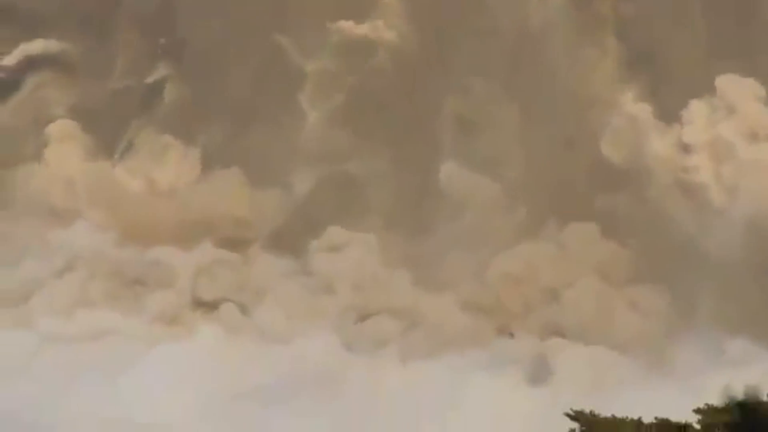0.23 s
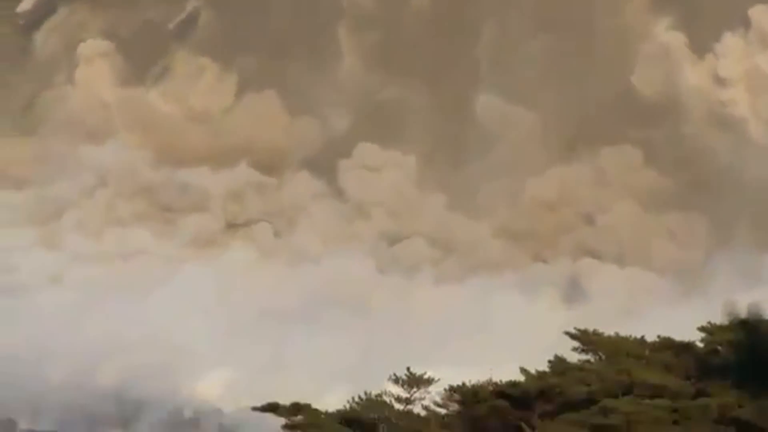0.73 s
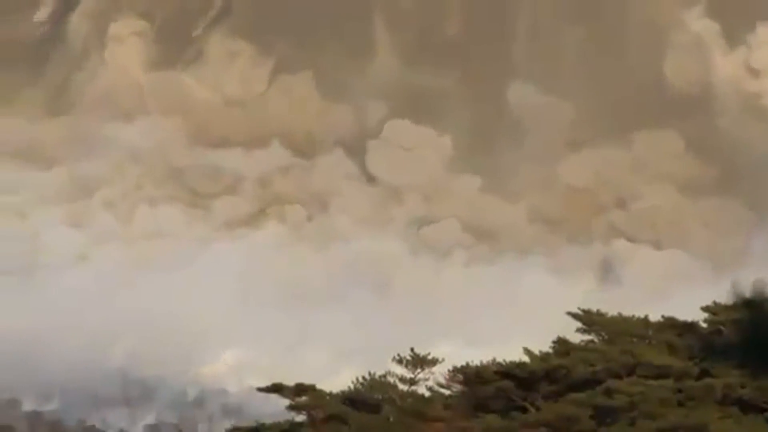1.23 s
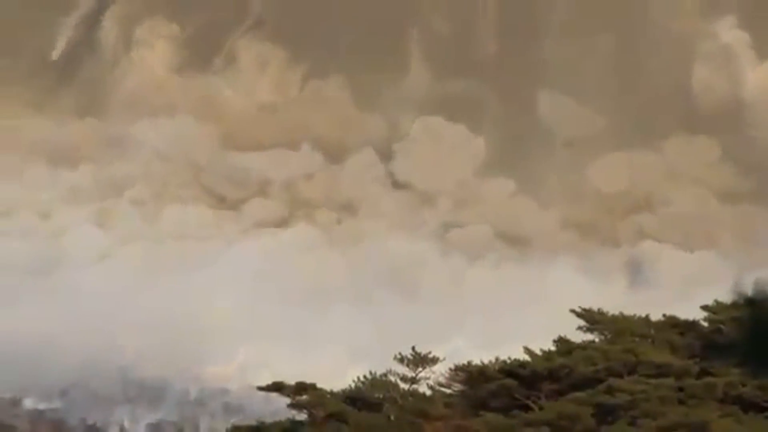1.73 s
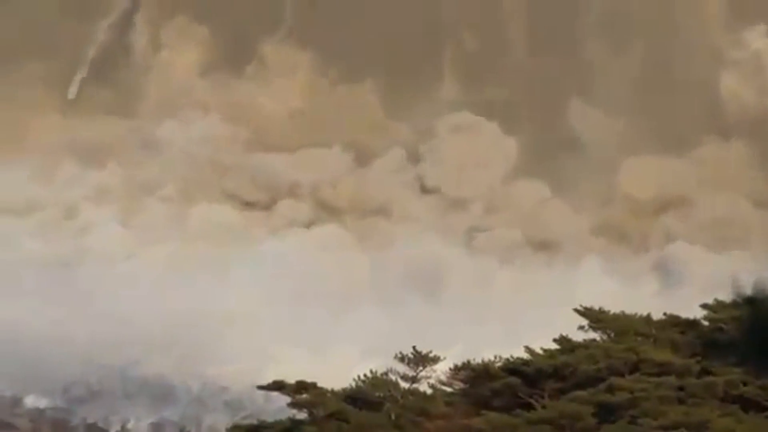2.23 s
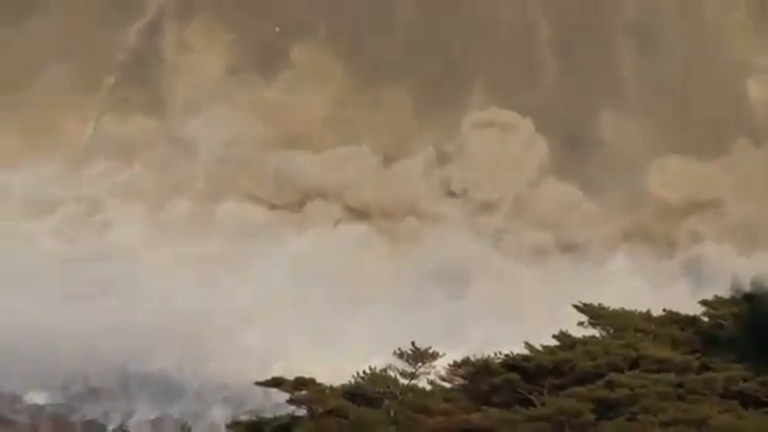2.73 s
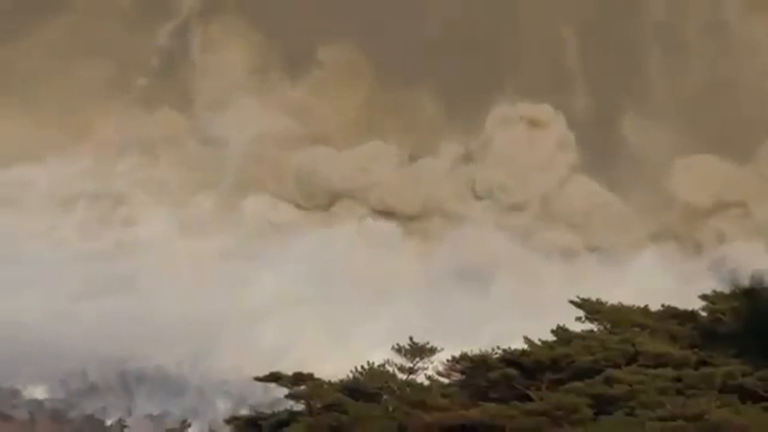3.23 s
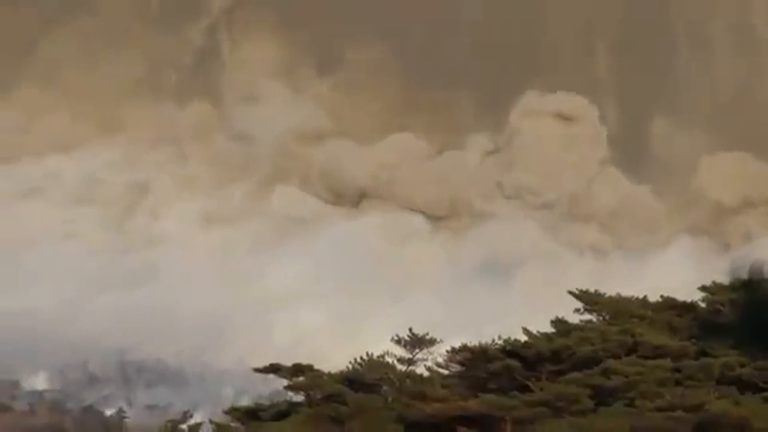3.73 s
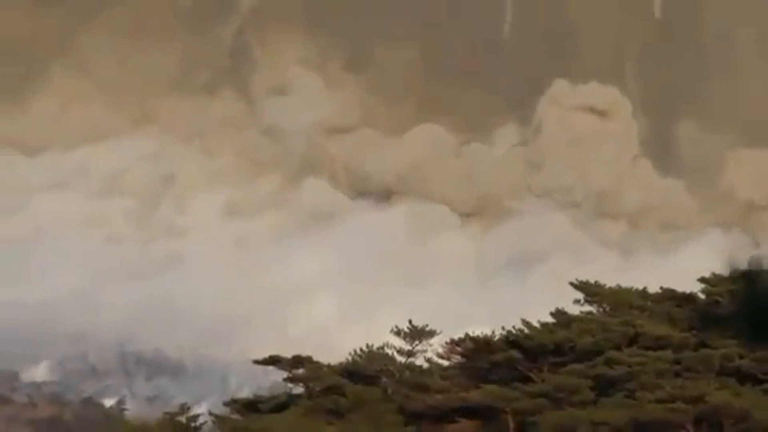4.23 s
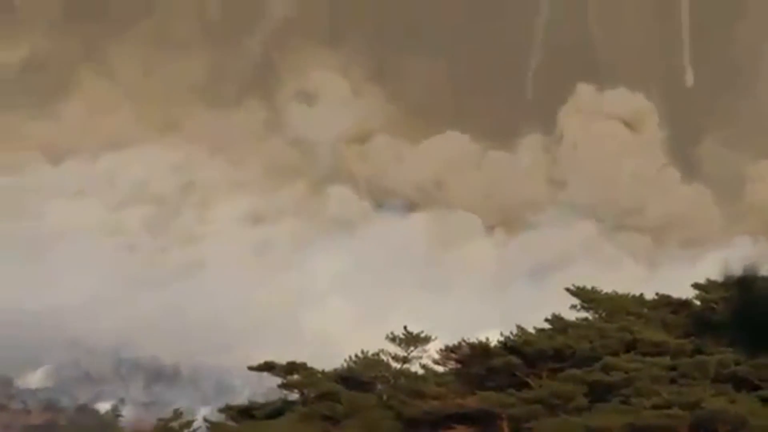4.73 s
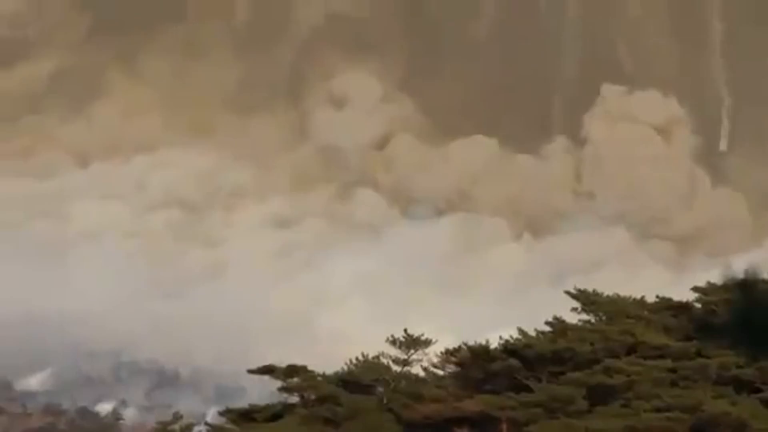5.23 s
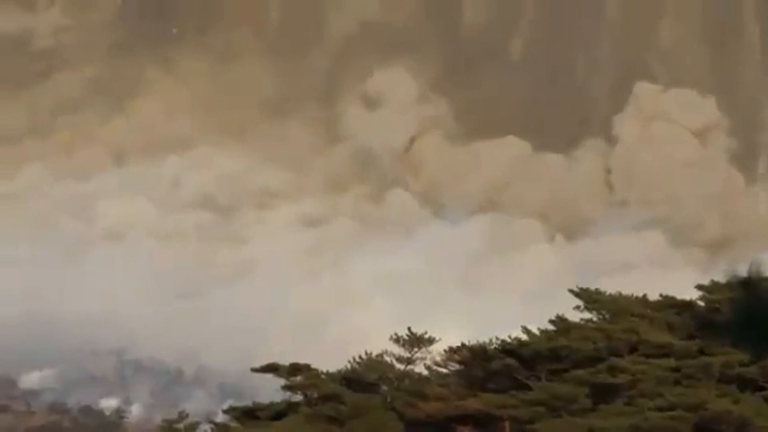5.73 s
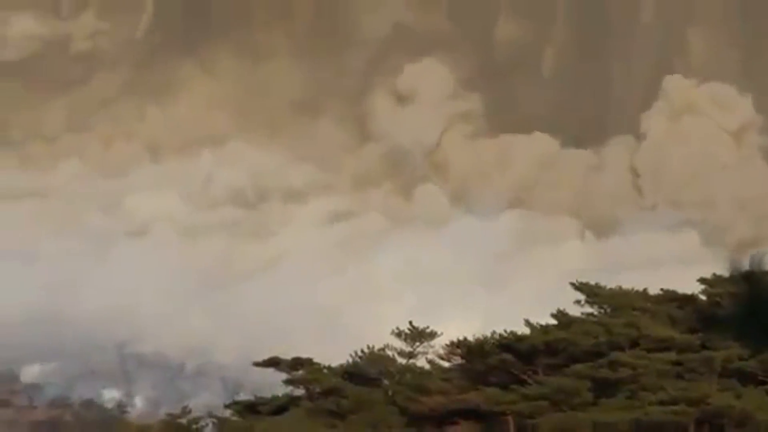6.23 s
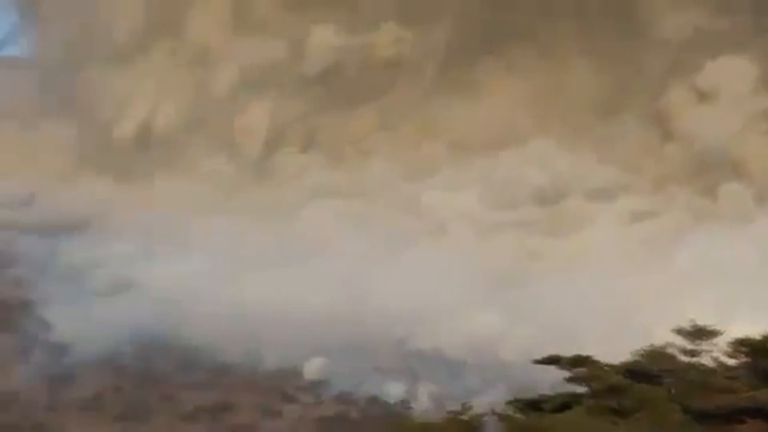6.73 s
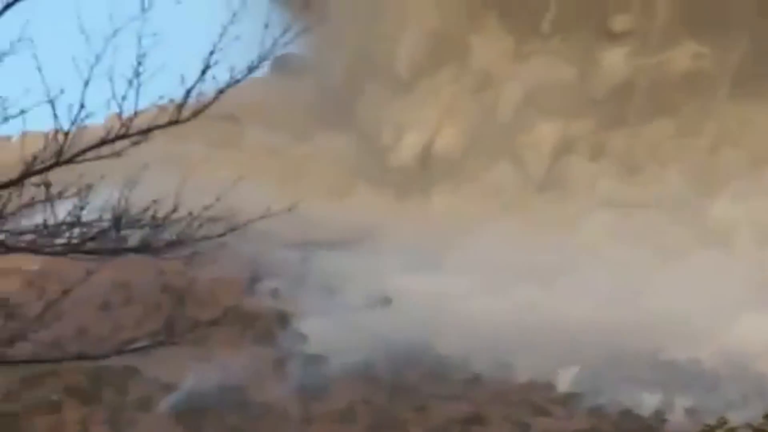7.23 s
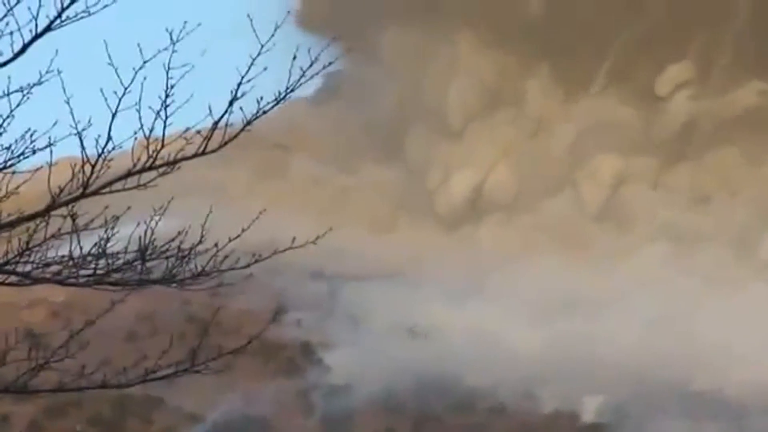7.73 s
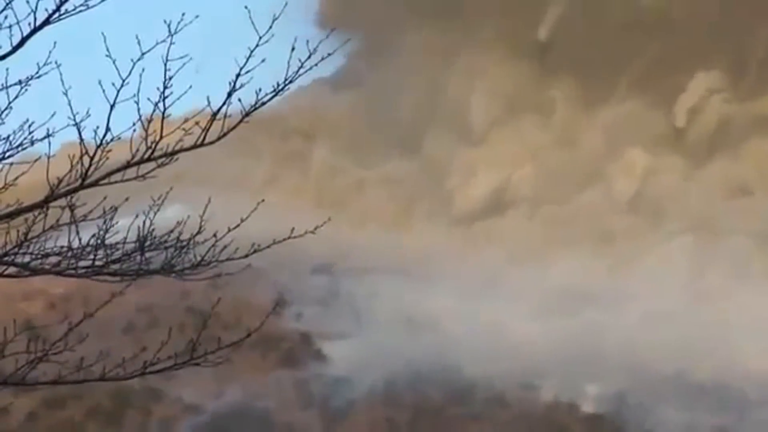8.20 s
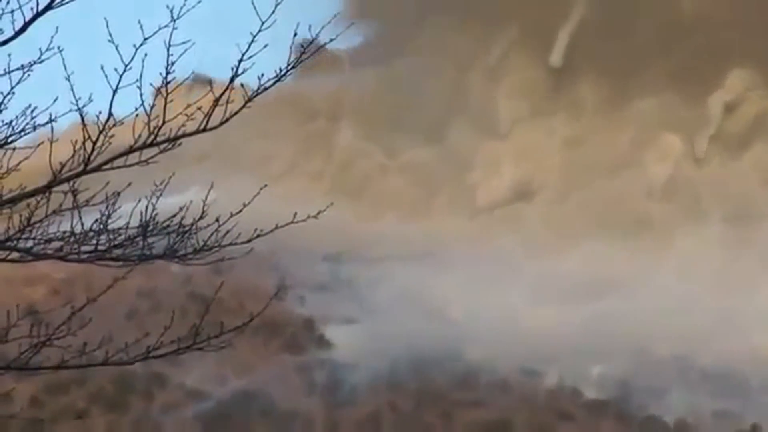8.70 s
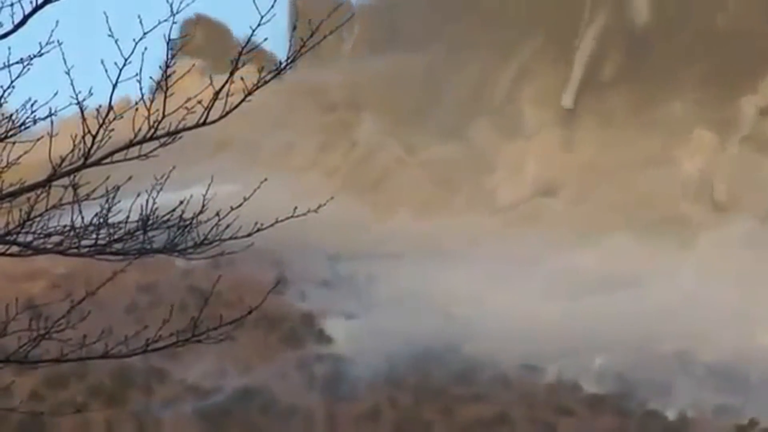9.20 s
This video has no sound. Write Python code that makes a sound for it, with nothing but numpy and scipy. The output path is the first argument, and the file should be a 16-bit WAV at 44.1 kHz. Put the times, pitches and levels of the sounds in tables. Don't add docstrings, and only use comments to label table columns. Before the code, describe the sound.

Wind buffets dominate, low fluttering thuds that overload a small handheld stereo microphone and briefly push down the steady rushing roar of a far-off ash eruption. Beneath it lies lumpy bass rumble with irregular booms. Small clicks come early and around the two-thirds mark. Near the end, metallic starter gears engage close by, leaning left, chug five times, whirr freely and release.

```python
import sys
import numpy as np
from scipy import signal
from scipy.fft import rfft, irfft
from scipy.io import wavfile
from scipy.ndimage import uniform_filter1d

SR = 44100
rng = np.random.default_rng(int(sys.argv[2]) if len(sys.argv) > 2 else 0)


def dump_mix(stems):
    frames = np.atleast_2d(stems).T
    limited = np.clip(frames, -1, 1)
    pcm = np.round(limited * 32767).astype(np.int16)
    wavfile.write(sys.argv[1], SR, pcm)


def level_to_linear(level):
    exponent = np.asarray(level, float) / 20
    return 10 ** exponent


N = 417186
HZ = np.fft.rfftfreq(N, 1 / SR)
TIME = np.arange(N) / SR

# start_s, deep_db, growl_over_deep_db
VENT = [(0.0, -17.5, -9), (0.26, -30, 1), (0.53, -25, -6), (0.61, -16.5, -14), (0.66, -22, -3.5),
        (1.18, -29, 1), (1.74, -25, -6), (2.08, -27, 1), (2.16, -26, -3), (4.4, -29, -4),
        (4.58, -20.5, -11), (4.77, -29.5, -4.5), (5.45, -23.5, -9), (6.24, -31.5, -1.5), (7.77, -30.5, -3),
        (8.25, -28.5, -3.5), (8.38, -33.5, -1), (9.46, -32, -3)]
# freq_hz, density_db
DEEP = [(35, -22.5), (46, 1.5), (70, 5), (105, -2), (135, -37)]
GROWL = [(85, -26), (112, 1.5), (160, 1), (230, -7), (340, -11), (450, -22.5)]
# start_s, peak_db, pitch_hz, length_cycles
BOOMS = [(0.612, -30, 61.9, 2.5), (0.796, -10.5, 145.5, 4.5), (0.917, -9.5, 114, 2.1), (1.24, -20, 130, 6),
         (1.509, -29, 82, 7.5), (1.909, -28, 60.4, 2.5), (2.289, -15, 62.4, 2.8), (3.028, -10, 144, 2.7),
         (3.812, -5, 96.9, 0.79), (4.574, -21, 61.3, 4.7), (5.373, -12, 61, 2.3), (7.353, -25, 87.5, 2.5),
         (9.043, -10, 63, 1), (2.27, -18.5, 140, 5), (5.05, -25, 290, 16.5), (8.17, -18.5, 167, 5.4),
         (9.07, -15, 107, 5.3), (1.78, -20.5, 213.5, 6), (1.38, -23, 315, 8), (3.02, -19.5, 272, 7.5)]
LUMPS_DB, LUMP_S = 1.5, 0.07
RUMBLE_DIPS = 0.69

# freq_hz, density_db
ROAR_COLOUR = [(150, -20.5), (260, -4), (445, -3), (535, -6.5), (1050, -7), (1850, -12.5), (2230, -12.5),
               (2640, -11), (2890, -13), (4180, -20), (5510, -18.5), (6220, -22), (7370, -23.5),
               (10200, -28.5), (13200, -48), (22000, -120)]
# freq_hz, width_hz, lift_db
HOLLOWS = [(2100, 39, 8), (2300, 56, 7.5), (2580, 39, 8), (2840, 50, 2), (3530, 6, 9.5), (5410, 54, 7),
           (5630, 50, 7), (5890, 45, 8)]
ROAR_DB = -29

# start_s, whirr_db, shaft_speed (0-1)
STARTER = [
    (8.362, -41.5, 0.13),
    (8.38, -21, 0.2),
    (8.53, -24.5, 0),
    (8.55, -36.5, 0.61),
    (8.98, -41, 0.53),
    (9.06, -25, 0.75),
    (9.3, -23.5, 0.94),
    (9.375, -17.5, 0.67),
    (9.46, -30.5, 0.07),
]
# start_s, rise_s, peak_db
STROKES = [
    (8.548, 0.067, -20),
    (8.691, 0.033, -19),
    (8.798, 0.026, -19),
    (8.895, 0.019, -18),
    (8.992, .027, -20),
]
CATCH_DB, FALL_DB_PER_S = -8, 235
# start_s, level_db, rattle_s, treble_tilt_db
CLUNKS = [
    (8.366, -35.5, 0.025, -3),
    (8.378, -20, 0.015, 7),
    (8.392, -12, 0.012, 0.5),
    (8.691, -23.5, 0.0077, 1.5),
    (8.799, -22, 0.014, 1),
    (8.99, -18.5, 0.013, -1.5),
    (9.368, -18.5, .016, -0.5),
]
# freq_hz, width_hz, level_db
CASING = [(380, 69, -15.5), (620, 73, -7.5), (766, 15, -1), (840, 81, 0), (930, 35, -9.5), (990, 24, -1.5),
          (1205, 60, -5), (1250, 96, -16)]
HOUSING = [(1440, 120, -3.5), (1607, 40, 3.5), (1730, 38, 3.5), (1845, 40, 4.5), (1930, 66, -32),
           (2030, 200, -20)]
GEARS = [(2110, 190, -9.5), (2600, 120, -11.5), (2686, 28, -18), (2950, 69, -12.5), (3750, 50, -10),
         (3900, 130, -12), (4140, 120, -10), (4860, 480, -18), (6280, 280, -18.5), (6740, 200, -21.5)]
BRUSHES = [(7360, 1200, -26), (8550, 100, -24), (8800, 60, -31), (8800, 5900, -27.5)]
# slow_db, full_speed_db
LIFTS = [
    (6.5, -2),
    (-4.5, -1),
    (-2, 10.5),
    (-13.5, 8.5),
]
# freq_hz, level_db
CLATTER = [(300, -41), (600, -8), (2300, -4.5), (3400, -15.5), (6600, -20), (7200, -42), (10300, -47.5)]
# middle_s, length_s, from_hz, to_hz, peak_db
MOANS = [(8.403, 0.036, 730, 710, -30), (8.398, 0.018, 1730, 1660, -18.5), (8.412, 0.076, 370, 380, -26.5),
         (8.445, .09, 783, 840, -26), (8.593, .055, 1642, 1545, -18), (8.618, .05, 926, 940, -19.5),
         (8.62, 0.04, 2100, 1540, -20), (8.72, 0.042, 1816, 1746, -18), (8.73, .03, 2266, 2130, -23),
         (8.826, .04, 1890, 1697, -21), (8.387, 0.0358, 2330, 2490, -21), (8.931, .035, 1910, 1585, -17.5),
         (9.01, 0.018, 794, 745, -30), (9.023, 0.049, 1850, 1790, -15.5), (9.028, .03, 2260, 2250, -23),
         (9.27, 0.14, 1845, 1800, -27), (9.29, .05, 825, 823, -23), (9.34, .05, 780, 790, -21),
         (9.341, 0.074, 1563, 1560, -26), (9.375, .045, 2550, 2480, -17.5), (9.2, 0.39, 2580, 2570, -32),
         (9.25, 0.28, 3880, 3840, -29), (9.4, 0.045, 620, 612, -24), (9.411, 0.078, 342, 337, -28)]
WAVER = 0.014
# freq_hz, left_minus_right_db
SHADOW = [(300, 0), (600, 2.5), (4700, 2.5), (6800, 4.5), (8000, 14.5), (10300, 19)]
# freq_hz, likeness (0-1)
DIRECT = [(300, 1), (1100, 0.96), (2300, 1), (4700, 0.67), (7000, 0.18), (9700, 0.38)]
LAST, ROOMY = 60000, 2 ** 16

# start_s, peak_db, pitch_hz
TICKS = [
    (0.716, -24, 2300),
    (6.664, -21, 2330),
    (6.9334, -15.5, 1510),
    (6.953, -23, 1730),
]

# start_s, level_db
WIND = [(0.0, -25.5), (0.08, -12), (0.21, -34), (0.58, -12), (0.79, -17), (2.5, -18), (2.61, -19),
        (5.37, -15), (5.43, -28.5), (5.77, -12), (6.01, -23), (6.4, -16.5), (6.58, -36), (6.66, -18),
        (7.48, -22.5), (8.22, -9.5), (9.35, -31), (9.46, -16.5)]
# freq_hz, density_db
HEAVE = [(1, -26.5), (4, 5.5), (7, -1.5), (12, 4), (16, 2.5), (21, -64)]
THROB = [(13, -43), (18, -8), (30, -7), (42, -13.5), (55, -31)]
HEAVE_DB, HEAVE_FOLLOWS = -16, 0.36
# start_s, gain_dip_db, extra_heave_db
BUFFETS = [(.24, 6, 23), (.5, 2.5, 0), (.66, 2, 4), (1.15, 0.5, 4), (1.4, 1.5, 2), (1.62, 1.5, 13.5),
           (1.9, 2, 3), (2.3, 1, 1.5), (2.62, 0.5, 4), (3.05, 3, 1.5), (3.49, 3, -4), (3.56, 5, 11),
           (3.95, 0, 0), (4.22, 5.5, 13), (4.62, 5.5, 1), (4.81, 4, 5), (4.96, 5, 0), (5.3, 2.5, -0.5),
           (5.43, 6, 13), (5.52, 2, 3.5), (5.69, 4.5, 4), (5.77, 3.5, 1.5), (5.9, 2, 6), (6.97, 2, 5),
           (7.43, 4.5, 4.5), (7.72, 4.5, 0), (7.81, 2, 16), (8.03, 2.5, 2), (8.17, 5.5, -4),
           (8.38, 2.5, 0.5)]
BUFFET_S = 0.07
GRAB_S, QUICK_S, SLOW_S, SLOW_SHARE = 0.0061, 0.087, 0.58, 0.25

# freq_hz, likeness (0-1)
SAME = [(5, 1), (12, 0.3), (25, 0.65), (60, 1), (125, 0.96), (260, 0.93), (530, 0.84), (1100, 0.71),
        (2270, 0.82), (4700, 0.65), (9700, 0.64)]
# freq_hz, left_minus_right_db
LEAN = [(60, -1), (120, 2.5), (260, 0), (530, 2.5), (1100, 3.5), (2270, 4.5), (4700, 2.5), (9720, 0.5)]
# freq_hz, threshold_db (under the local level)
WEAK = [(4000, -12), (5800, -3.6), (8000, -2.2), (10300, -.6)]
CEILING = 0.95


def rumble():
    deep_db, growl_db = curves(VENT)
    deep_db = deep_db - RUMBLE_DIPS * dips()
    out = level_to_linear(deep_db) * air(walled(DEEP), steady=0.26)
    out += level_to_linear(deep_db + growl_db) * air(walled(GROWL))
    count = round(LUMP_S * SR)
    lumps = uniform_filter1d(uniform_filter1d(rng.standard_normal(N), count), count)
    out *= level_to_linear(LUMPS_DB * evened(lumps))
    for s, db, hz, cycles in BOOMS:
        u = TIME[:SR // 4] * hz / cycles
        swell = u * np.exp(1 - u * 2.55) * 3.26
        add(out, s, level_to_linear(db - 6.5) * swell * np.sin(2 * np.pi * cycles * u))
    return out


def roar():
    lift_db = sum(db / (1 + ((HZ - f) / width * 2) ** 2) for f, width, db in HOLLOWS)
    noise = air(walled(ROAR_COLOUR) * level_to_linear(lift_db))
    z = signal.stft(noise, nperseg=512, noverlap=384)[2]
    patches = rng.standard_normal((z.shape[2], z.shape[1])).T
    patches = evened(uniform_filter1d(uniform_filter1d(patches, 9, 0), 20, 1))
    flicker = evened(uniform_filter1d(rng.standard_normal(z.shape[2]), 9))
    z = z * level_to_linear(0.83 * patches + 0.74 * flicker)
    x = signal.istft(z, nperseg=512, noverlap=384)[1][:, :N]
    return level_to_linear(ROAR_DB - dips()) * x


def starter():
    whirr_db, speed = curves(STARTER)
    lifts_db = [slow_db + (fast_db - slow_db) * speed for slow_db, fast_db in LIFTS]
    power = level_to_linear(whirr_db) ** 2 * (TIME > STARTER[0][0])
    t = TIME[:SR // 4]
    for s, rise, peak_db in STROKES:
        load_db = np.where(t < rise, CATCH_DB * (1 - t / rise), -FALL_DB_PER_S * (t - rise))
        add(power, s, level_to_linear(peak_db + load_db) ** 2)
    teeth = (rng.random(N) < 2500 / SR) * level_to_linear(0.67 * rng.exponential(1, N))
    teeth = evened(teeth) * np.sqrt(power)
    tilt_db = np.zeros(N)
    t = TIME[:4000]
    for s, db, rattle, tilt in CLUNKS:
        fade = np.exp(-t / rattle) * np.minimum(t / 0.0022, 1)
        add(teeth, s, level_to_linear(db) * fade * rng.standard_normal(4000))
        add(tilt_db, s, tilt * (fade > 0.2))
    hz = np.fft.rfftfreq(ROOMY, 1 / SR)
    groups = [causal(bumps(modes, hz)) for modes in (CASING, HOUSING, GEARS, BRUSHES)]
    clatter = causal(level_to_linear(read(CLATTER, hz)))
    senses = rng.choice([-1, 1], (LAST, 5, 3)).T
    z = rfft(teeth[-LAST:] * senses[:, -1], ROOMY) * clatter
    sides = (-1, 0, 1, 0)
    for k, (lift_db, group, side) in enumerate(zip(lifts_db, groups, sides)):
        blows = teeth * level_to_linear(lift_db + side * tilt_db)
        z += rfft(blows[-LAST:] * senses[:, k], ROOMY) * group
    z = z / np.sqrt(np.mean(abs(sum(groups) + clatter) ** 2))
    z[0] += rfft(moans()[-LAST:], ROOMY)
    direct, lean = np.clip(read(DIRECT, hz), 0, 1), level_to_linear(read(SHADOW, hz) / 2)
    mixed = np.sqrt(direct) * z[0] + np.sqrt(1 - direct) * z[1:]
    ports = irfft(mixed * [lean, 1 / lean])
    return np.pad(ports[:, :LAST], [(0, 0), (N - LAST, 0)])


def moans():
    out = np.zeros(N)
    for (s, length, from_hz, to_hz, db), start in zip(MOANS, rng.random(len(MOANS))):
        count = round(length * SR)
        waver = evened(uniform_filter1d(rng.standard_normal(count), 120))
        pitch_hz = np.linspace(from_hz, to_hz, count) * (1 + WAVER * waver)
        turns = start + np.cumsum(pitch_hz) / SR
        add(out, s - length / 2, level_to_linear(db) * np.hanning(count) * np.sin(2 * np.pi * turns))
    return out


def ticks():
    out = np.zeros(N)
    for s, db, hz in TICKS:
        u = np.arange(0, 3.5, hz / SR)
        add(out, s, level_to_linear(db) * np.sin(np.pi * u / 3.5) * np.sin(2 * np.pi * u))
    return out * level_to_linear([[1.5], [-1.5]])


def wind():
    throb_db, = curves(WIND)
    heave_db = HEAVE_DB + HEAVE_FOLLOWS * (throb_db - throb_db.mean())
    heave_db += sum(db * np.exp(-((TIME - s) / BUFFET_S) ** 2) for s, _, db in BUFFETS)
    push = level_to_linear(heave_db) * air(walled(HEAVE), steady=0.2)
    push += level_to_linear(throb_db) * air(walled(THROB), steady=0.1)
    return np.tanh(push / 0.75) * 0.75


def dips():
    coarse = TIME[::64]
    starts, depths_db = np.array(BUFFETS)[:, :2].T
    t = np.maximum(coarse[:, None] - starts, 0)
    recovery = (1 - SLOW_SHARE) * np.exp(-t / QUICK_S) + SLOW_SHARE * np.exp(-t / SLOW_S)
    shape = (1 - np.exp(-t / GRAB_S)) * recovery
    return np.interp(TIME, coarse, shape @ depths_db)


def air(gain, steady=0.):
    a, b, c, d = rng.standard_normal((len(HZ), 4)).T
    same = np.clip(read(SAME, HZ), -1, 1)
    lean = level_to_linear(read(LEAN, HZ) / 2)
    left = a + 1j * b
    right = same * left + np.sqrt(1 - same ** 2) * (c + 1j * d)
    z = np.array([left * lean, right / lean]) * gain
    whole = np.fft.ifft(z, N)
    swell = np.sqrt((abs(whole) ** 2).mean(0))
    x = (whole / (swell + 0.13 * swell.mean()) ** steady).real
    return x / np.sqrt(np.mean(x.mean(0) ** 2))


def causal(gain):
    echo = irfft(np.log(gain + 1e-5))
    echo[1:len(echo) // 2] *= 2
    echo[len(echo) // 2 + 1:] = 0
    return np.exp(rfft(echo))


def bumps(modes, hz):
    total = 0
    for f, width, db in modes:
        detune = (hz - f ** 2 / (hz + 1)) / width
        total = total + level_to_linear(db) ** 2 / (1 + detune ** 2) ** 1.07
    return np.sqrt(total)


def walled(points):
    return level_to_linear(read(points, HZ)) * (HZ > points[0][0]) * (HZ < points[-1][0])


def read(points, hz):
    f, value = np.transpose(points)
    return np.interp(np.log(hz + 1), np.log(f + 1), value)


def curves(rows):
    s, *columns = np.transpose(rows)
    return [np.interp(TIME, s, c) for c in columns]


def evened(x):
    return x / np.sqrt(np.mean(x ** 2) + 1e-20)


def add(mix, s, sound):
    part = mix[..., round(s * SR):][..., :len(sound)]
    part += sound[:part.shape[-1]]


def scene():
    return rumble() + roar() + starter() + ticks() + wind()


def low_pass(x):
    return signal.sosfilt(signal.butter(12, 10320, fs=SR, output="sos"), x)


def record(dry):
    limited = dry / (1 + (dry / CEILING) ** 6) ** (1 / 6)
    left, right = limited - 0.002
    hz, _, z = signal.stft([left + right, left - right], SR, nperseg=2048, noverlap=1536)
    power = uniform_filter1d(uniform_filter1d(abs(z) ** 2, size=3, axis=2), size=5, axis=1)
    local = uniform_filter1d(power, size=40, axis=1)
    strong = power > local * level_to_linear(2 * read(WEAK, hz))[:, None]
    kept = strong | (hz < WEAK[0][0])[:, None]
    mid, side = signal.istft(z * kept, nperseg=2048, noverlap=1536)[1][:, :N]
    return low_pass(np.array([mid + side, mid - side]) / 2)


dry = scene()
out = record(dry)
dump_mix(out)
```